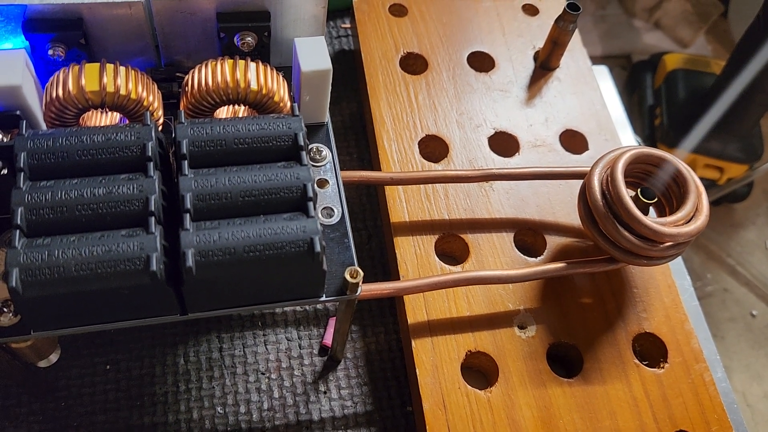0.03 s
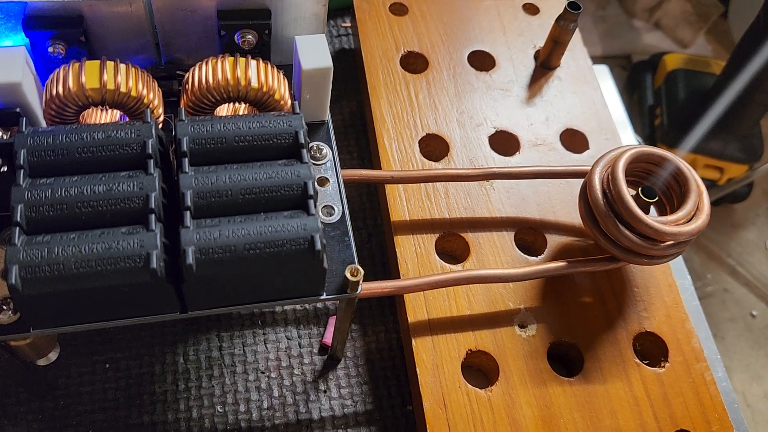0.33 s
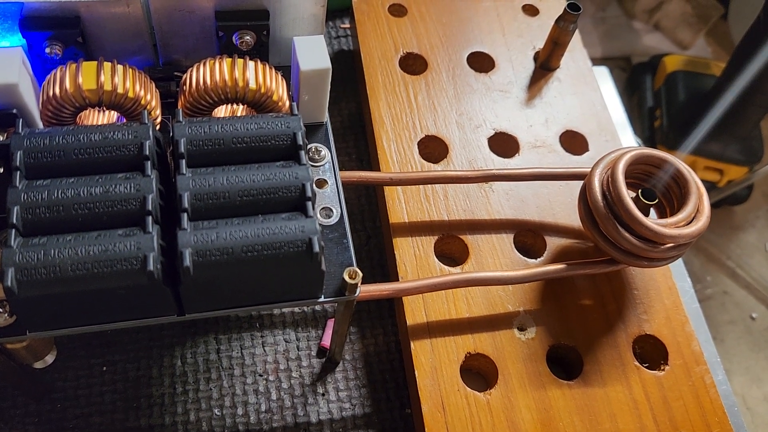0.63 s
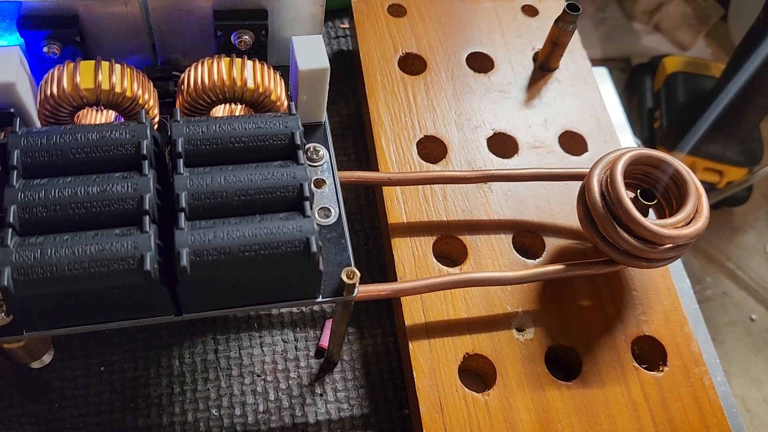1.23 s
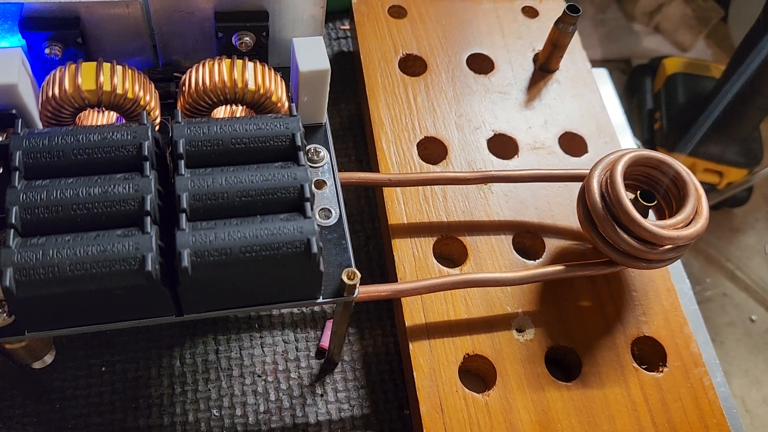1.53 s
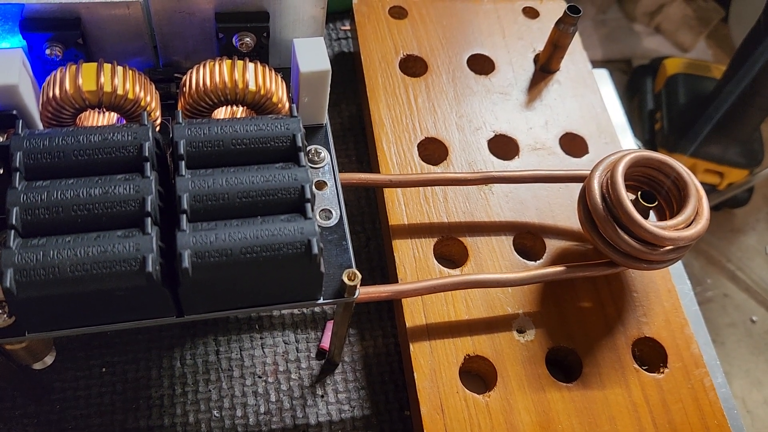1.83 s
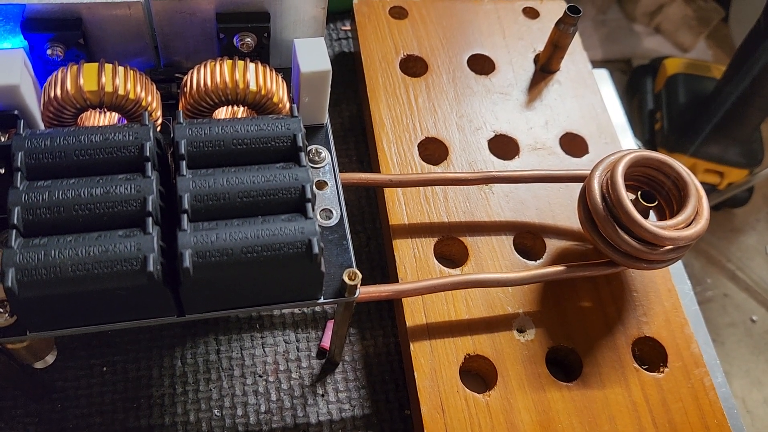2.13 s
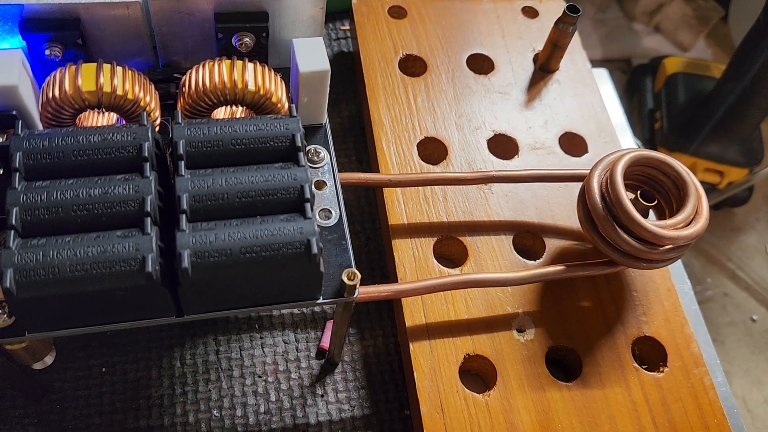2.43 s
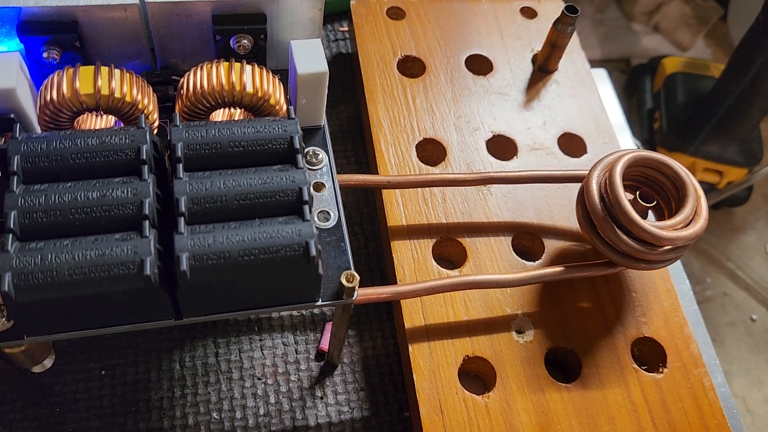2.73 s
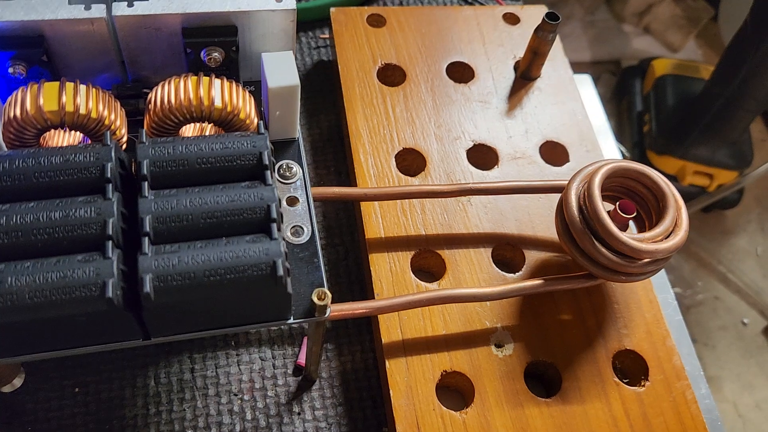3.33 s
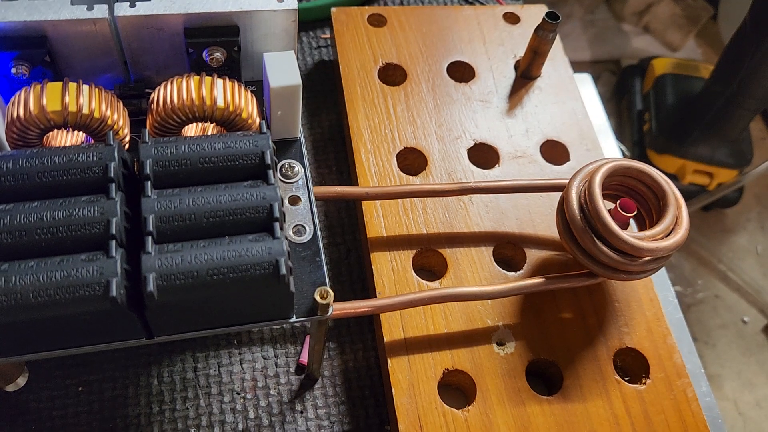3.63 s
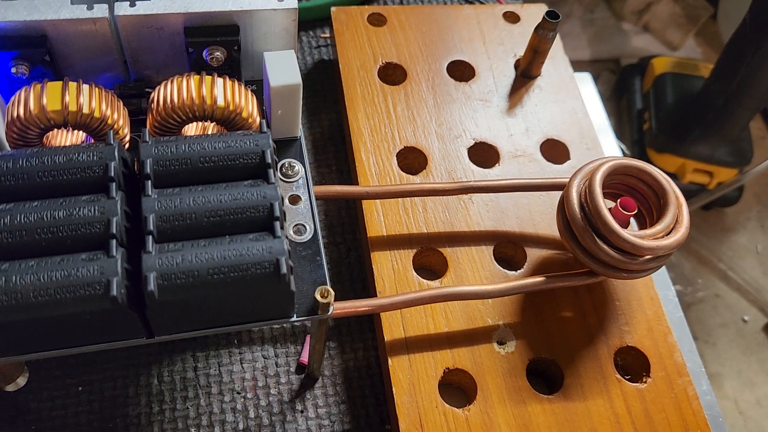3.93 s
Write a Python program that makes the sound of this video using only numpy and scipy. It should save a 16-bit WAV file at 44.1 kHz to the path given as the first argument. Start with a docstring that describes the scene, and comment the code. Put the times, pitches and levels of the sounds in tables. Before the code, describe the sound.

An induction heater's cooling fan hums, whines and buzzes steadily, close by on a workbench, over rushing air and a low rumble. A faint sizzle passes, and near the end metal snaps once, sharply, in the small room.

```python
"""An induction heater runs on a workbench, close by. From the start its four-bladed cooling fan hums,
whines and buzzes at nearly steady speed over rushing air, faint mains hum and an uneven low rumble.
Around 1.5 s a faint sizzle passes and the fan's treble changes colour. At 3.5 s comes a faint tick, at
3.8 s one sharp snap, probably from the metal tube heating in the coil, and the small room answers."""
import sys
import numpy as np
from scipy import signal
from scipy.fft import rfft, irfft, next_fast_len
from scipy.io import wavfile
from scipy.ndimage import map_coordinates

SR = 44100
rng = np.random.default_rng(int(sys.argv[2]) if len(sys.argv) > 2 else 0)


def master_out(mix):
    """Clip the mix to full scale and print it as 16-bit PCM to the path in sys.argv[1]."""
    frames = np.transpose(np.atleast_2d(mix))
    ceiling = np.clip(frames, -1, 1)
    pcm = np.round(ceiling * 32767).astype(np.int16)
    wavfile.write(sys.argv[1], SR, pcm)


N = 176400

# fan speed (time [s], speed [turns/s])
FAN_SPEED = [(0, 47.55), (.3, 47.54), (.63, 47.6), (1.05, 47.52), (1.48, 47.6), (1.7, 47.51), (2.05, 47.52),
             (2.9, 47.465), (4, 47.475)]
# motor whine (order [cycles/turn], left [dB], right [dB])
WHINE_LINES = [(21, -79, -86), (22, -80, -87), (25, -83, -74), (29, -71, -76), (30, -60, -60),
               (31, -76, -73), (32, -71, -71), (33, -71, -71), (35, -73, -69), (36, -73, -71),
               (38, -76, -74), (43, -78, -78), (54, -80, -91), (59, -77, -93), (74, -78, -86),
               (84, -78, -97), (89, -77, -95), (124, -80, -97), (129, -81, -97), (173, -87, -92)]
# phase lead of the fan's tones on the left (frequency [Hz], lead [rad])
LEFT_LEAD = [(190, .1), (290, .3), (430, 1.2), (660, 1.2), (770, -.3), (1190, .4), (1370, -2.6),
             (1430, -2.2), (1700, -2), (1800, -.4), (2100, 0), (3000, 1.5), (3600, .3), (8000, 1)]


def amp(db):
    """Decibels to gain."""
    return 10 ** (np.asarray(db) / 20)


def unit(x):
    """x at rms 1."""
    return x / np.sqrt(np.mean(x ** 2) + 1e-20)


def along(points, hz):
    """Each value column of a table, read on a log frequency axis."""
    f, *cols = np.transpose(points)
    return np.array([np.interp(np.log(hz + 1), np.log(f + 1), c) for c in cols])


def curve(rows):
    """One value per sample from (time [s], value) rows."""
    return np.interp(np.arange(N) / SR, *np.transpose(rows))


def wobble(rate_hz):
    """Smooth random curve, rate_hz knots a second."""
    knots = rng.standard_normal(int(N * rate_hz / SR) + 4)
    return map_coordinates(knots, [np.arange(N) * rate_hz / SR], mode="nearest")


def filtered(x, response):
    """x through a frequency response."""
    n = x.shape[-1]
    m = next_fast_len(n + SR // 2)
    return irfft(rfft(x, m) * response(np.fft.rfftfreq(m, 1 / SR)), m)[..., :n]


def noise(colour, shape=(2, N)):
    """Coloured noise at rms 1."""
    return unit(filtered(rng.standard_normal(shape), lambda hz: amp(along(colour, hz)[0])))


def rumble_and_mains():
    """Uneven rumble and mains hum, in opposite polarity left and right."""
    # rumble envelope (time [s], relative level [dB])
    envelope = [(0, -75), (.2, -56), (.37, -64), (.7, -63), (1.15, -58), (1.8, -58.5), (2.3, -57.5),
                (2.6, -60.5), (2.67, -82), (2.78, -56.5), (3, -66.5), (4, -63)]
    # rumble spectrum (frequency [Hz], relative density [dB])
    colour = [(15, -28), (30, -18), (42, -15), (55, 8.5), (64, 1.5), (76, 1.5), (90, -25), (125, -12),
              (200, -52)]
    mains_hz = 59.6
    mid, side = noise(colour)
    rumble = amp(curve(envelope)) * (mid + amp(-16) * np.array([side, -side]))
    mains = amp(-68) * np.sqrt(2) * np.sin(2 * np.pi * (mains_hz * np.arange(N) / SR + rng.random()))
    return (rumble + mains) * amp([[.45], [-.45]])


def sizzle():
    """Brief fluttering hiss, mostly on the left."""
    # envelope (time [s], left level [dB])
    envelope = [(0, -100), (1.1, -88), (1.25, -81), (1.5, -72), (1.6, -78), (1.75, -100)]
    # spectrum (frequency [Hz], relative density [dB])
    colour = [(2500, -40), (3400, -9), (3850, 7), (4400, -15), (5200, -2), (5800, -19), (8000, -18),
              (11000, -45)]
    hiss = noise(colour)
    flutter_db = 1.2 * wobble(70)
    return hiss * amp(curve(envelope) + flutter_db) * amp([[0], [-11]])


def air_rush():
    """Air through the fan and heat sinks, partly coherent between the sides."""
    # spectrum (frequency [Hz], left density [dB/Hz], right density [dB/Hz])
    density = [(24.5, -102, -102), (60, -85.5, -81.5), (147, -82.5, -87), (265, -88, -91),
               (365, -85, -94.5), (440, -96, -100), (636, -84.5, -89), (920, -100, -104),
               (1065, -101, -104), (1437, -95, -93), (1650, -99, -100), (1724, -102, -91.5),
               (2000, -103, -103), (2580, -107, -112), (2930, -105, -109), (3420, -107, -117),
               (6000, -107, -118), (8050, -106, -116), (8600, -110, -115), (10600, -121, -121),
               (11700, -122, -129), (15600, -119, -128), (16400, -145, -150)]
    # left-right likeness (frequency [Hz], coherence [-1..1])
    coherence = [(150, 0.96), (400, 0.57), (700, -0.38), (1300, -0.63), (2400, -0.12), (5000, -0.32)]
    a, b = rng.standard_normal((2, N)) * np.sqrt(SR / 2)
    mix_rad = lambda hz: np.arccos(np.clip(along(coherence, hz), -1, 1)) / 2
    mid = filtered(a, lambda hz: amp(along(density, hz)) * np.cos(mix_rad(hz)))
    side = filtered(b, lambda hz: amp(along(density, hz)) * np.sin(mix_rad(hz)))
    return (mid + side * [[1], [-1]]) * amp(0.18 * wobble(7.2))


def shaft_tones(turns, lines, waver_db=0, waver_hz=4.23):
    """Sines locked to the shaft; orders up to 6 throb once a turn, the rest swell three times a turn."""
    out = np.zeros((2, N))
    for order, left_db, right_db in lines:
        offset_cycles = (order > 6) * order ** 2 / 3
        phase = 2 * np.pi * (order * turns + offset_cycles) + 0.61 * rng.standard_normal()
        lead_rad = along(LEFT_LEAD, order * FAN_SPEED[0][1])[0]
        gain = amp([[left_db], [right_db]]) * amp(waver_db * wobble(waver_hz))
        out += gain * np.sin([phase, phase - lead_rad])
    return np.sqrt(2) * out


def motor_buzz(turns, ticks_per_turn=10, turn_samples=8192):
    """Unequal ticks, the same every turn, coloured by the fan's frame; every fifth overtone stands out."""
    # overtone envelope (frequency [Hz], left [dB], right [dB])
    colour = [(824, -82.5, -81), (935, -88.5, -94), (1120, -84, -91), (1290, -85.5, -85.5),
              (1750, -85.5, -88), (2250, -80.5, -89), (2200, -96, -92), (2410, -85, -103),
              (2900, -88.5, -103), (2905, -84.5, -82.5), (3430, -95, -99.5), (3870, -81, -112),
              (4020, -84.5, -102), (4260, -93.5, -104), (4930, -84, -101), (5300, -89, -101),
              (6450, -82, -100), (6770, -92.5, -103), (7230, -82.5, -100), (8050, -90, -106),
              (8440, -89, -101), (9900, -109, -107), (15000, -114, -122)]
    jitter_s, scatter_db, fifth_boost_db = 4e-6, 3, 3
    orders = np.setdiff1d(np.arange(17, 331), np.array(WHINE_LINES)[:, 0]).astype(int)
    shaft_hz = np.mean(np.array(FAN_SPEED)[:, 1])
    hz = orders * shaft_hz
    strengths = np.exp(0.56 * rng.standard_normal(ticks_per_turn))
    tick_turns = (np.arange(ticks_per_turn) + 0.1142 * rng.standard_normal(ticks_per_turn)) / ticks_per_turn
    ticks = np.exp(-2j * np.pi * orders[:, None] * tick_turns) @ strengths
    level_db = along(colour, hz) - 2 + fifth_boost_db * (orders % 5 == 4)
    level_db += scatter_db * rng.standard_normal(len(hz))
    shift_rad = .7 * rng.standard_normal((2, len(hz))) - along(LEFT_LEAD, hz) * [[0], [1]]
    spectrum = np.zeros((2, turn_samples // 2 + 1), complex)
    spectrum[:, orders] = amp(level_db) * np.exp(1j * (np.angle(ticks) + shift_rad))
    one_turn = irfft(spectrum) * turn_samples / np.sqrt(2)
    position = (turns + jitter_s * shaft_hz * wobble(60)) % 1 * turn_samples
    return np.array([np.interp(position, np.arange(turn_samples), side) for side in one_turn])


def motor_whine(turns):
    """High shaft orders, each wavering slightly in level."""
    return shaft_tones(turns, WHINE_LINES, waver_db=0.2)


def blade_hum(turns):
    """Blades and rotor: low shaft orders, strongest at the blade rate, four a turn."""
    # hum (order [cycles/turn], left [dB], right [dB])
    lines = [(3, -60, -65), (4, -50, -53), (5, -67, -72), (6, -67, -73), (7, -75, -81), (8, -63, -73),
             (9, -68, -86), (10, -73, -87), (12, -72, -78), (13, -68, -74), (14, -70, -77), (15, -67, -82),
             (16, -75, -72)]
    return shaft_tones(turns, lines)


def shift_colour(x):
    """The treble fades from an early colour to a late one, then partly back."""
    # early colour over late (frequency [Hz], excess [dB])
    excess = [(1500, 0.67), (2800, 0.5), (3400, -1), (3750, 3), (4250, -3), (4700, -2), (5300, 6),
              (6000, -1), (6500, 0.6), (7700, 3.6), (8400, 0)]
    # crossfade (time [s], early share [0..1])
    early_share = [(0, 0.58), (1.1, .75), (1.45, 0.73), (1.56, 0.55), (1.66, 0.18), (3, 0), (4, 0.59)]
    share = curve(early_share)
    early = filtered(x, lambda hz: amp(along(excess, hz) / 2))
    late = filtered(x, lambda hz: amp(-along(excess, hz) / 2))
    return share * early + (1 - share) * late


def metal_snap(start_s, level_db):
    """A crack with a very short metallic ring, left of centre; bench, walls and room answer."""
    # metal modes (frequency [Hz], relative level [dB], t60 [s])
    modes = [(3380, -28, 0.022), (3960, -8.5, 0.016), (6310, 1.5, 0.0045), (6590, 2, 0.0047),
             (7640, 0, .009), (12870, -10.5, 0.01), (15900, -11, 0.0074)]
    # crack spectrum (frequency [Hz], relative density [dB])
    colour = [(300, -34), (1000, -25), (1700, -13.5), (3000, -13.5), (5000, -4.5), (6500, 0), (9500, -8.5),
              (11500, 1), (16000, -3)]
    # room tails (delay [s], t60 [s], left [dB], right [dB])
    tails = [(.001, 0.049, -8, -12), (0.016, 0.094, -15.5, -22), (.02, 0.37, -20, -27)]
    crack_t60_s, attack_s, right_lag_s, room_cutoff_hz = .0075, .00012, .0004, 10100
    t = np.arange(SR // 2) / SR
    ring = sum(amp(db - 60 * t / t60_s) * np.sin(2 * np.pi * hz * t) for hz, db, t60_s in modes)
    crack = noise(colour, len(t)) * amp(1 - 60 * t / crack_t60_s)
    click = amp(level_db) * (ring + crack) * (1 - np.exp(-t / attack_s))
    paths = np.zeros((2, len(t)))
    for delay_s, t60_s, left_db, right_db in tails:
        tail = rng.standard_normal((2, len(t))) * (t > delay_s) * amp(-60 * abs(t - delay_s) / t60_s)
        paths += amp([[left_db], [right_db]]) * tail / np.linalg.norm(tail[0])
    paths = filtered(paths, lambda hz: 1 / np.sqrt(1 + (hz / room_cutoff_hz) ** 4))
    paths[0, 0] += 1  # direct sound
    paths[1, round(right_lag_s * SR)] += amp(-12)
    heard = signal.fftconvolve(click[None], paths, axes=1)
    return np.pad(heard, ((0, 0), (round(start_s * SR), 0)))[:, :N]


def scene():
    """One shaft drives hum, whine and buzz; air, sizzle, rumble, mains and snaps join them."""
    # faint tick, then loud snap (time [s], gain [dB])
    snaps = [(3.517, -63), (3.7849, -18.5)]
    turns = np.cumsum(curve(FAN_SPEED)) / SR
    fan = blade_hum(turns) + shift_colour(motor_whine(turns) + motor_buzz(turns) + air_rush())
    return fan + sizzle() + rumble_and_mains() + sum(metal_snap(s, db) for s, db in snaps)


def record(dry):
    """Steep low-pass at the band limit."""
    cutoff_hz = 16600
    return filtered(dry, lambda hz: 1 / np.sqrt(1 + (hz / cutoff_hz) ** 160))


dry = scene()
out = record(dry)
master_out(out)
```